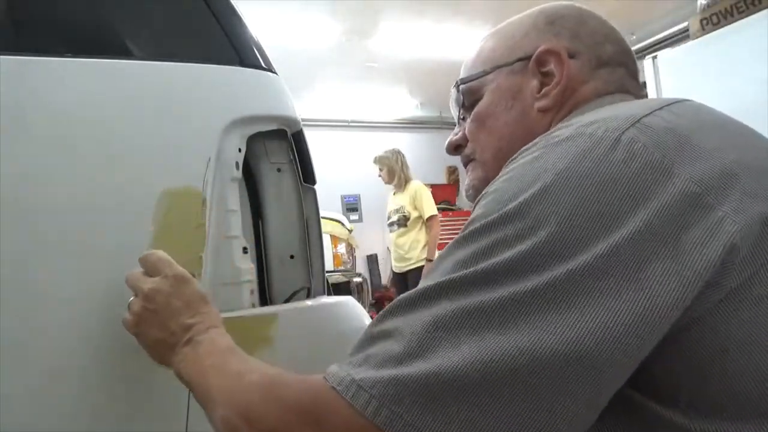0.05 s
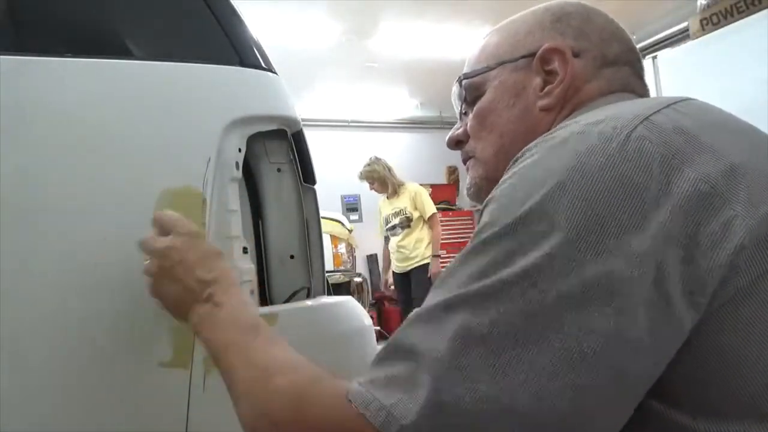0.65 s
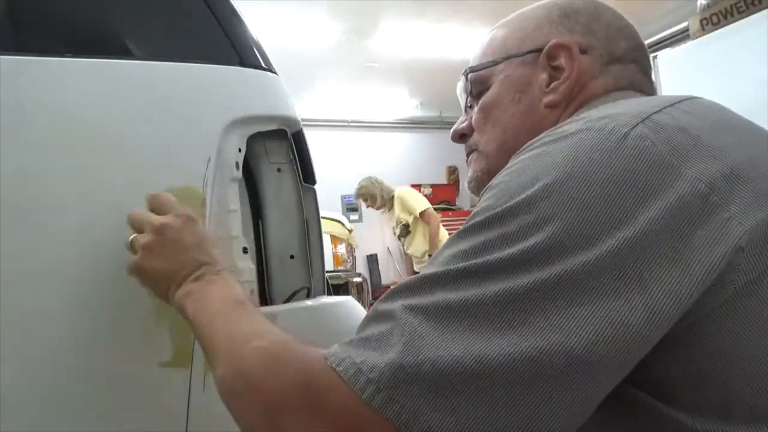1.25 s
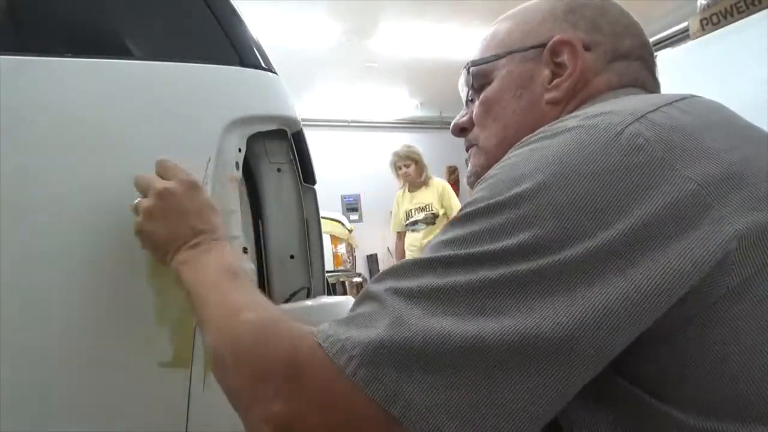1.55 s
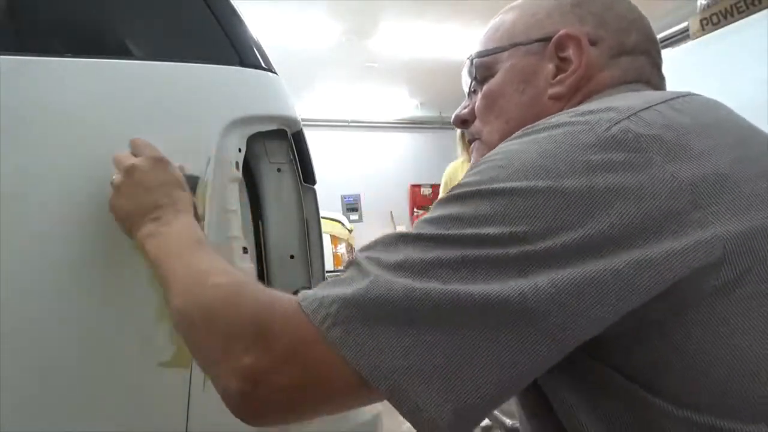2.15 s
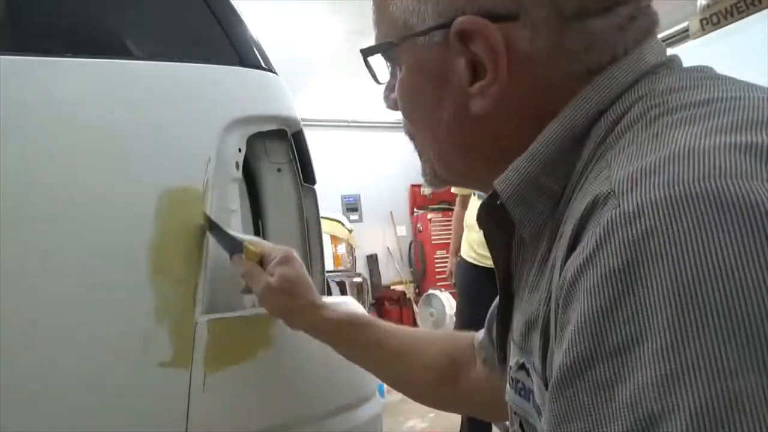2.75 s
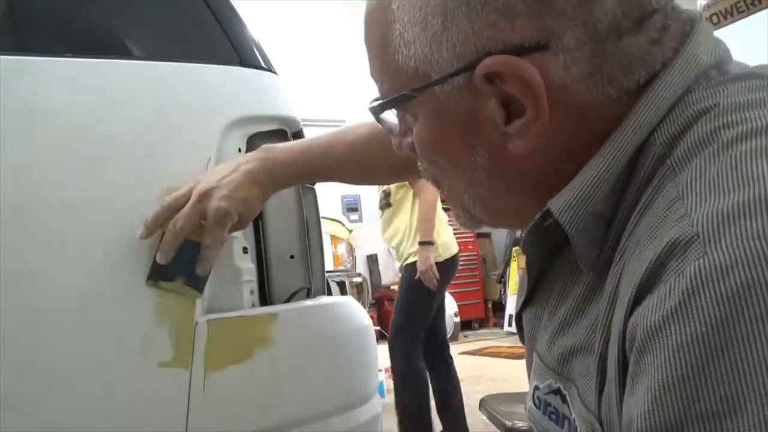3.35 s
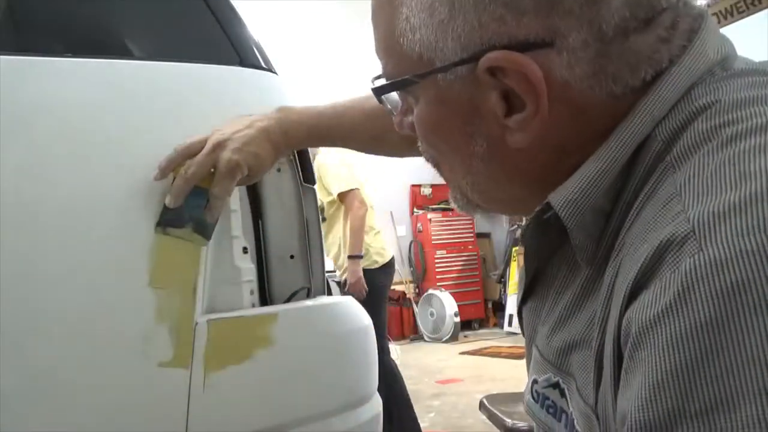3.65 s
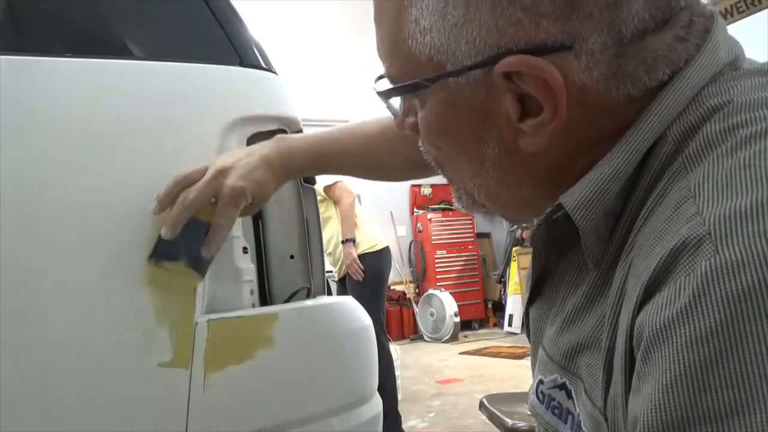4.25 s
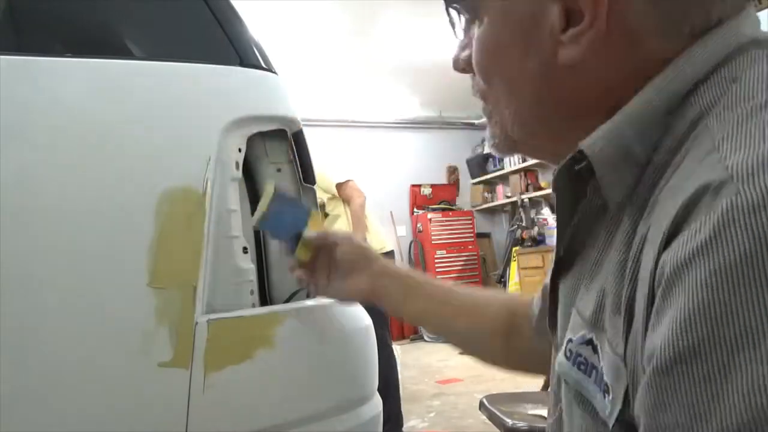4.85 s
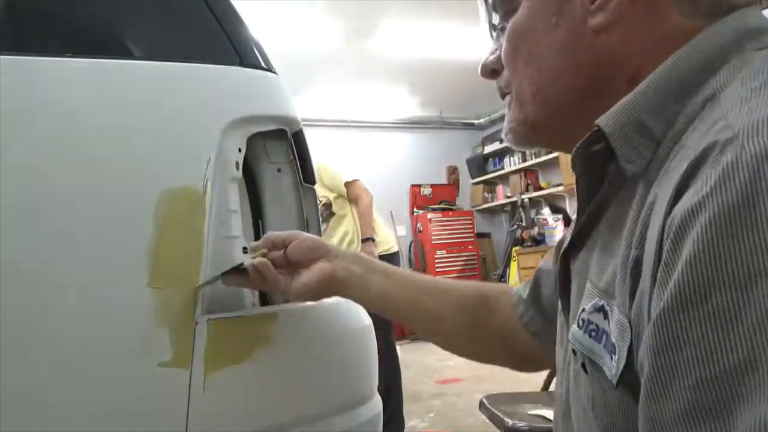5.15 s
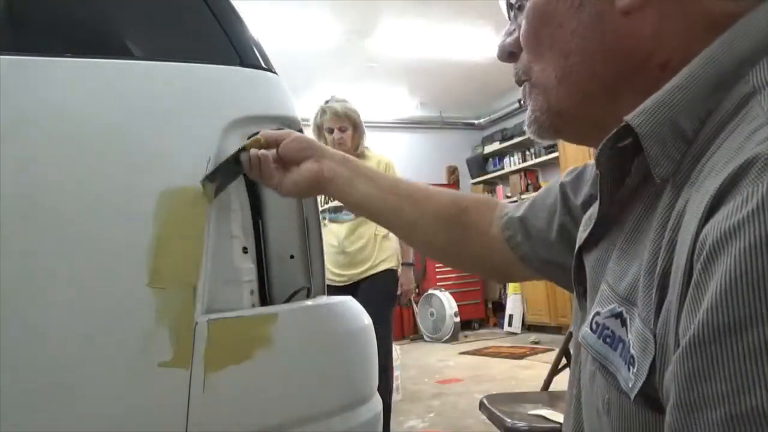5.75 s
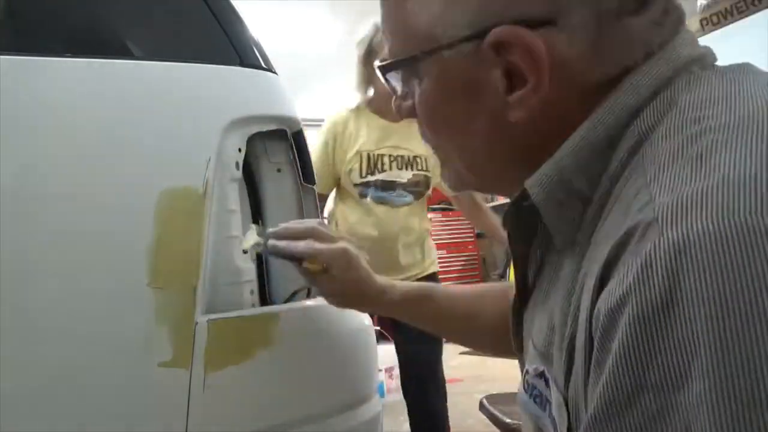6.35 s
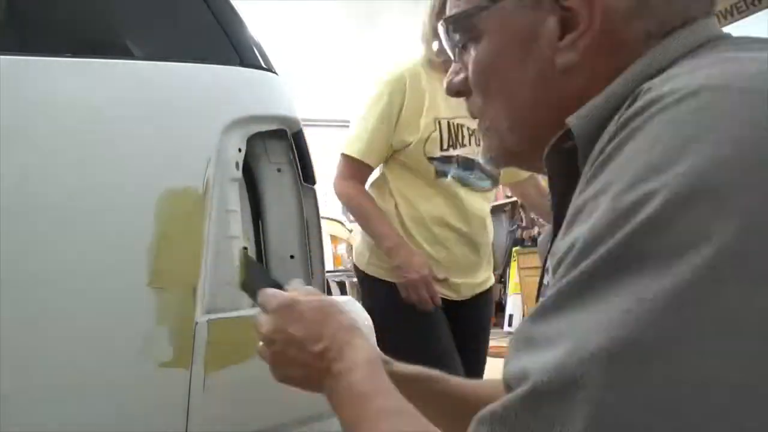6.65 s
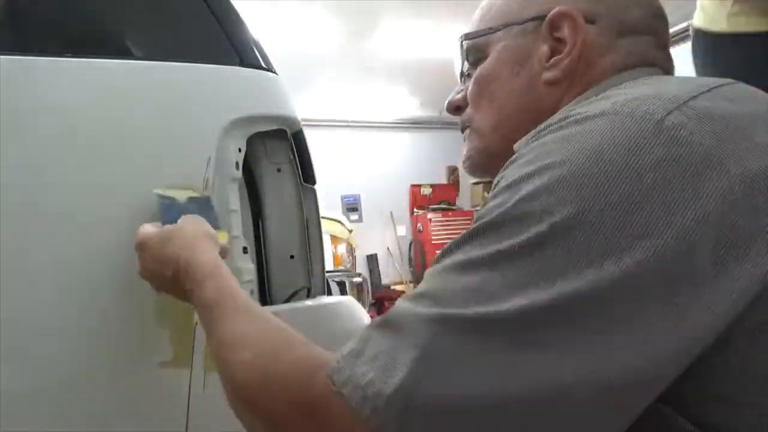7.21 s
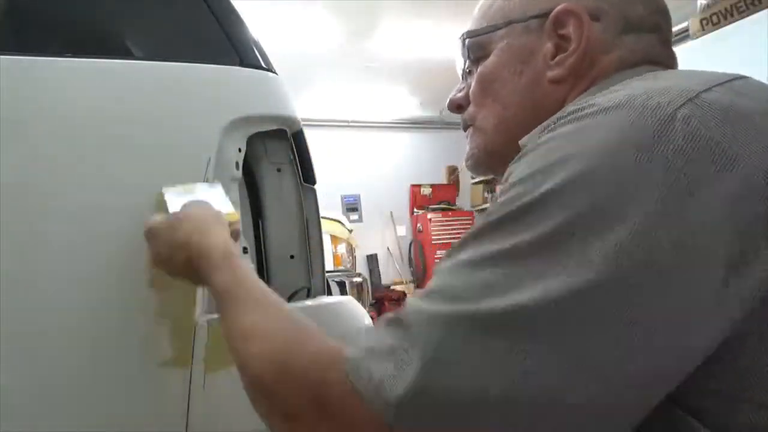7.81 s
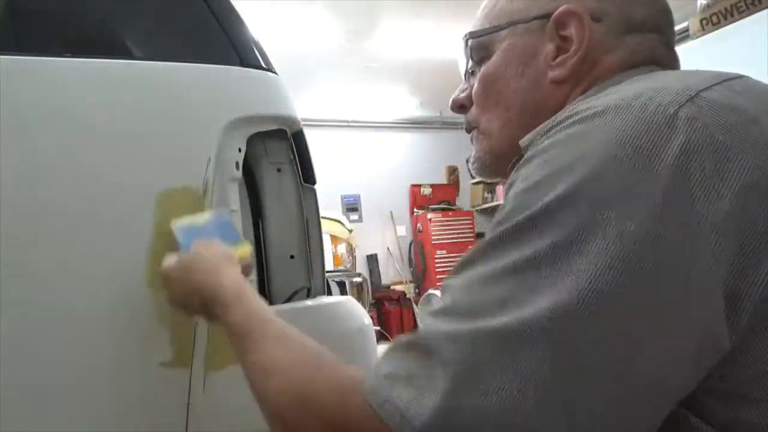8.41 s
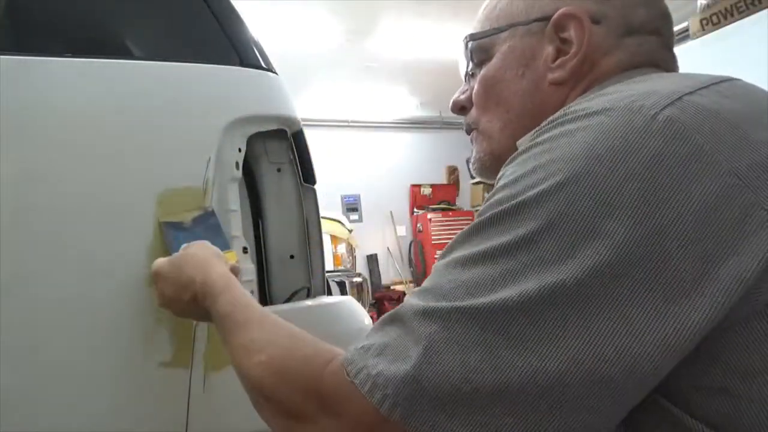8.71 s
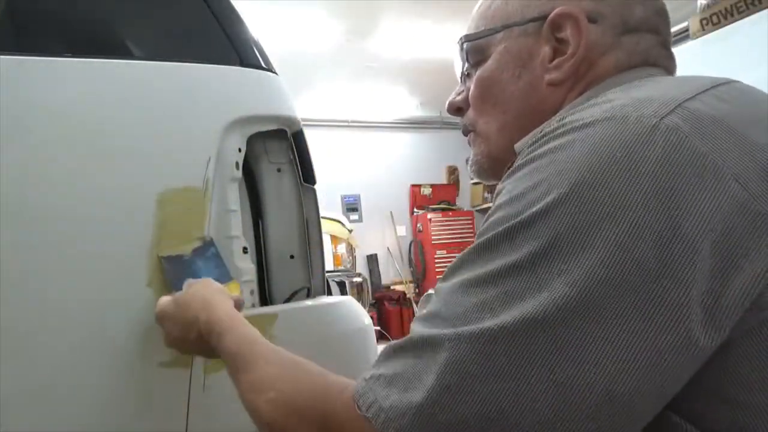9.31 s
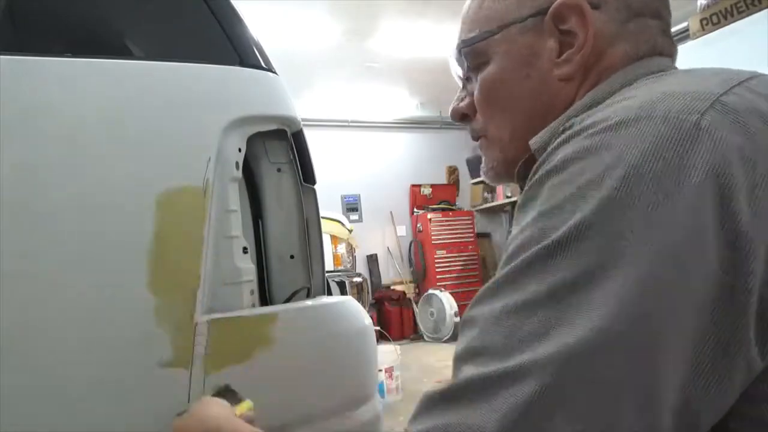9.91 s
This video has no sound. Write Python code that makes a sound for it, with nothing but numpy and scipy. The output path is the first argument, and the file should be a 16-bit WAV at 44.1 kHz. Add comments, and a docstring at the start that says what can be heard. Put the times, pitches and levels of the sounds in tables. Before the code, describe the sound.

A fan hums steadily in a garage while a small bird chirps sharply, followed by taps on a metal panel and brief sanding strokes.

```python
"""Sanding a van panel, with a bird in the garage.

A fan hums and hisses behind everything. Close to the microphones a man works a sanding sponge over
a painted panel: grit scrapes, the sponge squeaks, taps ring the metal, and someone walks behind him.
A small bird nearby gives six sharp chirps, shaped by its throat and beak, and whistles softly between
them. The camera's limiter ducks the fan under the chirps."""
import sys
import numpy as np
from scipy import signal
from scipy.fft import rfft, irfft, next_fast_len
from scipy.io import wavfile
from scipy.ndimage import uniform_filter1d

SR = 44100
rng = np.random.default_rng(int(sys.argv[2]) if len(sys.argv) > 2 else 0)


def store_pcm(level_fs):
    """Save levels as 16-bit WAV."""
    pcm = np.round(np.clip(level_fs, -1, 1) * 32767).astype(np.int16)
    wavfile.write(sys.argv[1], SR, np.atleast_2d(pcm).T)


N = 439661
T = np.arange(N) / SR
BINS = np.maximum(np.fft.rfftfreq(next_fast_len(N), 1 / SR), 1)

# Width of noise at the microphone pair. Each row: frequency in Hz, side minus mid in dB.
STEREO_WIDTH = [(60, -27), (99, -29), (160, -37), (270, -35), (450, -35), (740, -23.5), (1220, -18),
                (2010, -8.5), (3330, -7.5), (5500, -6), (9080, -7.5), (15000, -10.5)]
# Reflections off van and floor. Each row: left delay in seconds, right delay in seconds, gain in dB.
NEAR_ECHOES = [(.0031, .0036, -6), (.0074, 0.0052, -7), (0.0116, .0125, -7.5), (0.0172, .0164, -14)]
# Air rushing through the fan. Each row: frequency in Hz, relative density in dB.
AIR_SPECTRUM = [(25, -2), (55, -11), (90, -7), (130, -0.5), (220, 2), (265, -4), (350, 3), (450, -2),
                (650, 2), (850, 0), (2500, 0.5), (4300, -5), (8000, -8), (15800, -10)]
# Resonances of the fan housing. Each row: frequency in Hz, width in Hz, lift in dB.
HOUSING_MODES = [(160.2, 21, 5.8), (316.5, 4.1, 4), (532, 10.3, 9.2), (560, 13.4, 8), (618.4, 39, 7.2),
                 (661, 33, 7.85), (916, 31, 5.6), (1000, 150, 5.4), (1116, 110, 11.1), (1215, 52, 7),
                 (1260, 42, 9.1), (1321, 86, 9.6), (1650, 26, 9.3), (1756, 35, 3.3), (1945, 29, 9.2),
                 (2386, 13, 11), (2702, 83, 5.6), (3368, 76, 6.5), (3760, 53, 9.2), (4620, 72, 2.7),
                 (5500, 37, 3)]
# Hum of the fan motor. Each row: frequency in Hz, rms level in dB.
MOTOR_TONES = [(120, -62), (480, -54.5), (521, -52), (960, -42), (1093, -48), (1336, -39), (1480, -54),
               (2035, -58.5)]
# Knocks and thumps on the panel, with bumps and scuffs of feet.
# Each row: start in seconds, peak level in dB, centre in Hz.
KNOCKS_AND_BUMPS = [(3.091, -16.5, 2730), (3.398, -29, 300), (3.521, -25, 413), (3.545, -29, 130),
                    (5.684, -32, 150), (6.236, -35, 100), (7.119, -26, 1590), (8.284, -31.5, 190),
                    (9.243, -22, 1750), (9.249, -29, 150)]
# Pushes on the panel. Each row: start in seconds, gain in dB.
PANEL_PUSHES = [(9.065, -15), (9.251, -44)]
# Low modes of the panel. Each row: frequency in Hz, relative level in dB, seconds to fall 60 dB.
BOOM_MODES = [(140, -9, 0.078), (175, -15, 0.14), (321, 1.5, 0.11), (427, -6, 0.051), (500, -9, 0.054),
              (730, -3, 0.038)]
# Taps of sponge and fingers. Each row: start in seconds, level in dB.
PANEL_TAPS = [(5.823, -31), (7.120, -24.5), (7.758, -29.5), (9.0595, -20), (9.2435, -16), (9.459, -32)]
# The crunch of a tap. Each row: frequency in Hz, relative density in dB.
TAP_SPECTRUM = [(600, 2.5), (1500, 0.5), (4000, 1), (6200, 6.5), (9000, -0.5), (16000, -3)]
# Resonances of the panel's edge. Each row: frequency in Hz, width in Hz, lift in dB.
EDGE_RESONANCES = [(1580, 200, 14), (2220, 250, 14.2), (6000, 300, 2.2)]
# Grit on paint. Each row: frequency in Hz, relative density in dB.
GRIT_SPECTRUM = [(2000, -27), (4400, -4), (5200, 4.5), (6100, -3), (7100, 5.5), (8200, 4), (9300, -3),
                 (11200, -1.5), (12500, -11), (16000, -24)]
# Strokes of the sponge. Each row: start in seconds, length in seconds, level in dB.
SANDING_STROKES = [(7.64, 0.17, -41.5), (8.548, 0.28, -34.5), (9.73, 0.21, -43)]
# Sponge squeaks. Each row: start and length in seconds, middle pitch in Hz, glide in octaves, level in dB.
SPONGE_SQUEAKS = [(7.815, 0.022, 13300, .17, -42), (8.275, .055, 6040, -.26, -40),
                  (8.875, .1, 4800, -.09, -41)]
# Soft whistles. Each row: start and length in seconds, middle pitch in Hz, glide in octaves, level in dB.
BIRD_WHISTLES = [(2.584, 0.021, 3400, -0.062, -19), (2.715, 0.042, 4460, .08, -35.5),
                 (3.155, 0.025, 6620, -0.36, -40), (3.40, .11, 7450, 0.024, -41.5),
                 (4.355, 0.064, 7470, 0.18, -43), (4.535, .027, 7060, -0.051, -39),
                 (5.645, .055, 4640, -0.27, -37), (6.04, .085, 7350, 0.43, -42),
                 (6.135, .053, 7170, .04, -43), (6.775, 0.06, 4750, -0.31, -34)]
# Resonance of the bird's throat and beak. Each row: frequency in Hz, gain in dB.
THROAT_RESPONSE = [(1500, -43), (2200, 0.5), (2550, -10), (3000, 7), (4000, -21), (4750, -7.5), (5250, 1),
                   (6100, -22), (7800, -21), (8500, -12), (9200, -19), (10300, -10.5), (11300, -17.5),
                   (13000, -11), (16000, -42)]
# Sharp chirps. Each row: start and length in seconds, pitch the swoop aims at in Hz, then in dB
# the overall gain, fundamental gain, upper harmonics' gain and left minus right.
BIRD_CHIRPS = [(2.2857, 0.037, 2620, -7.5, -6, -1.5, -2.5), (2.563, .035, 2975, -6, -2.5, 1, -4),
               (2.838, 0.041, 2860, -7, -2, 3, -2.5), (4.2375, .044, 2723, -6, -7.5, 0, -3.5),
               (4.6371, .038, 2825, -5.5, -5, 3.5, -2), (6.605, .040, 2764, -5.5, -5, -0.5, -3)]


def from_db(db):
    """Decibels to gain."""
    return 10 ** (np.asarray(db) / 20)


def rms_one(x):
    """Scale to rms 1."""
    return x / np.sqrt(np.mean(x ** 2) + 1e-20)


def gain_at(points, hz):
    """Gain from a dB table, read on a log-frequency axis."""
    table_hz, table_db = np.transpose(points)
    return from_db(np.interp(np.log(hz), np.log(table_hz), table_db))


def add(out, start, sound, pan_db=0):
    """Mix a sound in at a time in seconds; pan is left minus right."""
    i = round(start * SR)
    out[:, i:i + sound.shape[-1]] += (sound * from_db([[pan_db / 2], [-pan_db / 2]]))[:, :N - i]


def noise(gain):
    """Noise of rms 1, coloured by a gain at each frequency."""
    size = next_fast_len(N)
    return rms_one(irfft(rfft(rng.standard_normal(size)) * gain, size)[:N])


def drift(rate_hz):
    """Random wander of rms 1, mostly slower than the given rate."""
    return noise(1 / (1 + (BINS / rate_hz) ** 2))


def resonant(spectrum, modes):
    """A smooth spectrum with resonances standing on it."""
    lift = sum((from_db(db) ** 2 - 1) / (1 + ((BINS - hz) / (0.48 * width)) ** 2) ** 2
               for hz, width, db in modes)
    return gain_at(spectrum, BINS) * np.sqrt(np.maximum(1 + lift, .1))


def stereo_noise(gain):
    """Noise at two close microphones, less alike towards the treble."""
    side_gain = gain * gain_at(STEREO_WIDTH, BINS)
    mid = noise(gain)
    side = noise(side_gain) * np.linalg.norm(side_gain) / np.linalg.norm(gain)
    return mid + side * [[1], [-1]]


def glides(rows, overtone_db, jitter, pan_db, easing, scratchy_hz=7000):
    """Thin gliding tones with an octave above, scratchier when high; positive easing levels them off."""
    out, tremble = np.zeros((2, N)), drift(500)
    for start, length, middle_hz, octaves, db in rows:
        progress = np.linspace(-.5, .5, int(length * SR))
        hz = middle_hz * 2 ** (octaves * (progress - easing * progress ** 2))
        scratch = jitter * min(middle_hz / scratchy_hz, 1) ** 3 * tremble[round(start * SR):][:len(hz)]
        phase = 2 * np.pi * np.cumsum(hz * (1 + scratch)) / SR
        tone = np.sin(phase) + from_db(overtone_db) * np.sin(2 * phase) * (2 * hz < SR / 2)
        add(out, start, from_db(db) * rms_one(tone * signal.windows.tukey(len(hz), .7)), pan_db)
    return out


def garage(x, build_s=0.0041, t60_s=0.12, tail_db=-4, side_share=0.47):
    """A few near reflections, then a short diffuse tail that the two microphones partly share."""
    t = T[:SR // 2]
    tail = rng.standard_normal(len(t)) + side_share * rng.standard_normal(len(t)) * [[1], [-1]]
    tail *= (1 - np.exp(-(t / build_s) ** 2)) * from_db(-60 * t / t60_s)
    response = from_db(tail_db) * rms_one(tail) / np.sqrt(len(t))
    for left_s, right_s, db in NEAR_ECHOES:
        response[[0, 1], [round(left_s * SR), round(right_s * SR)]] += from_db(db)
    return signal.fftconvolve(x, response, axes=1)[:, :N]


def fan(air_db=-31.5, wander_hz=1.215, flutter_db=1.5):
    """Air rushes through the housing; the motor's tones waver in the moving air."""
    air = from_db(air_db) * stereo_noise(resonant(AIR_SPECTRUM, HOUSING_MODES))
    hum = 0
    for hz, db in MOTOR_TONES:
        phase = 2 * np.pi * np.cumsum(hz + wander_hz * drift(9.3)) / SR
        hum += from_db(db) * rms_one(np.sin(phase) * from_db(flutter_db * drift(12)))
    return air + hum


def drone(hz=316, half_width_hz=7, db=-54.5, swell_at_s=7.03, swell_s=.8, swell_db=8):
    """A low, narrow drone sits in the fan's sound and swells late on."""
    band = noise(1 / (1 + ((BINS - hz) / half_width_hz) ** 2))
    swell = np.clip((T - swell_at_s) / swell_s, 0, 1)
    return band * from_db(db + swell_db * swell)


def knocks_and_bumps(shortest_t60_s=0.081, ring_cycles=6):
    """Panel knocks and thumps, bumps and scuffs of feet: bursts around one pitch, longer when low."""
    out, t = np.zeros((2, N)), T[:SR // 4]
    for start, db, hz in KNOCKS_AND_BUMPS:
        burst = rng.standard_normal(len(t)) * from_db(-60 * t / (shortest_t60_s + ring_cycles / hz))
        band = signal.butter(2, [hz / 1.7, hz * 1.34], "band", fs=SR, output="sos")
        bump = signal.sosfilt(band, burst)
        add(out, start, from_db(db) * bump / np.abs(bump).max())
    return out


def panel_booms():
    """A push sets the sheet metal booming in its low modes."""
    out, t = np.zeros((2, N)), T[:SR // 4]
    boom = sum((-1) ** k * np.sin(2 * np.pi * hz * t) * from_db(db - 60 * t / t60)
               for k, (hz, db, t60) in enumerate(BOOM_MODES))
    for start, db in PANEL_PUSHES:
        add(out, start, from_db(db) * boom)
    return out


def taps(rise_s=0.0019, t60_s=.025):
    """A tap is a brief crunch of grit that rings the panel's edge."""
    out, t = np.zeros((2, N)), T[:SR // 8]
    crunch = stereo_noise(resonant(TAP_SPECTRUM, EDGE_RESONANCES))
    fade = (1 - np.exp(-t / rise_s)) * from_db(-60 * t / t60_s)
    for k, (start, db) in enumerate(PANEL_TAPS):
        tap = fade / fade.max() * crunch[:, k * len(t):(k + 1) * len(t)]
        add(out, start, from_db(db) * tap, pan_db=-2)
    return out


def squeaks():
    """The sponge squeaks on the paint, right of centre."""
    return glides(SPONGE_SQUEAKS, overtone_db=-1, jitter=.02, pan_db=-4, easing=-.8)


def sanding(grain_db=1.5, ramp_share=0.19):
    """Grit catches on the paint in a fast, uneven hiss for the length of each stroke."""
    out = np.zeros((2, N))
    hiss = rms_one(stereo_noise(gain_at(GRIT_SPECTRUM, BINS)) * from_db(grain_db * drift(300)))
    for start, length, db in SANDING_STROKES:
        pressure = signal.windows.tukey(int(length * SR), ramp_share)
        stroke = pressure * hiss[:, round(start * SR):][:, :len(pressure)]
        add(out, start, from_db(db) * stroke, pan_db=-1)
    return out


def faint_whistles(count=4, from_s=4.6, until_s=6.5, length_s=.08, rise_octaves=0.167, db=-50.5):
    """Rows for the bird's faintest whistles, loosely spaced and at chance pitches."""
    slot_s = (until_s - from_s) / count
    rows = []
    for k, (late, high) in enumerate(rng.random((count, 2))):
        hz = 6450 * 2 ** (.2 * (2 * high - 1))   # up to 0.2 octave either way
        rows.append((from_s + (k + late) * slot_s, length_s, hz, rise_octaves, db))
    return rows


def whistles():
    """The bird whistles softly, dead centre, in nearly pure glides."""
    return glides(BIRD_WHISTLES + faint_whistles(), overtone_db=-20, jitter=0.031, pan_db=0, easing=.4)


def chirp_arch(length, top_hz, swoop_s=.0062, sag_s=0.01493, end_hz=2384,
               attack_s=0.0071, release_s=0.0062, rough_s=0.0071):
    """Pitch, effort and roughness of one chirp: it swoops up an octave, settles, then sags and frays."""
    t = T[:int(length * SR)]
    remaining = length - t
    swoop_hz = top_hz * (1 - .5 * np.exp(-t / swoop_s))
    sag_hz = (top_hz - end_hz) * np.maximum(1 - remaining / sag_s, 0)
    attack_db = -17 * np.maximum(1 - t / attack_s, 0)
    release_db = -4.5 * np.maximum(1 - remaining / release_s, 0)
    roughness = np.exp(-t / rough_s) + 0.43 * np.exp(-remaining / rough_s)
    return swoop_hz - sag_hz, attack_db + release_db, roughness


def chirps(flutter_db=2.5, rasp_db=-8.5, clean_jitter=.009, rough_jitter=.04):
    """Each chirp opens with a rasp, arches through the throat's resonances and roughens as it falls."""
    out, tremble = np.zeros((2, N)), drift(1280)
    no_bass = signal.butter(4, 1800, "high", fs=SR, output="sos")   # so small a throat gives no bass
    rasp = from_db(rasp_db) * signal.sosfilt(no_bass, noise(gain_at(THROAT_RESPONSE, BINS)))
    flutter = from_db(flutter_db * drift(630))   # fast unsteadiness roughens every partial
    lean_right = from_db([[-.5], [.5]])
    for start, length, top_hz, db, fundamental_db, upper_db, pan_db in BIRD_CHIRPS:
        pitch, effort_db, roughness = chirp_arch(length, top_hz)
        now = round(start * SR) + np.arange(len(pitch))
        hz = pitch * (1 + (clean_jitter + rough_jitter * roughness) * tremble[now])
        phase = 2 * np.pi * np.cumsum(hz) / SR
        first, second, *upper = (gain_at(THROAT_RESPONSE, k * hz) * np.sin(k * phase)
                                 for k in range(1, 5))
        brightness = from_db(upper_db + 0.28 * effort_db)   # upper harmonics grow with effort
        voice = from_db(fundamental_db) * first * lean_right + second + brightness * sum(upper)
        chirp = voice * flutter[now] + roughness * rasp[now]
        add(out, start, chirp * from_db(db + effort_db), pan_db)
    return out


def scene():
    """From beside the van: the bird sounds through the garage; the panel work is closer and drier."""
    bird = chirps() + whistles()
    work = sanding() + taps() + panel_booms() + knocks_and_bumps() + squeaks()
    room = garage(bird + from_db(-5) * work)
    return fan() + drone() + bird + work + room


def limiter(x, ceiling_db=-5, quick_db_per_s=260, slow_db_per_s=12, slow_share=0.3):
    """Peaks pull the gain down at once; part of it returns quickly, the rest slowly."""
    peak_db = 20 * np.log10(np.abs(x).max(axis=0) + 1e-9)
    over_db = np.maximum(peak_db - ceiling_db, 0)
    quick = np.maximum.accumulate(over_db + quick_db_per_s * T) - quick_db_per_s * T
    slow = np.maximum.accumulate(slow_share * over_db + slow_db_per_s * T) - slow_db_per_s * T
    return x * from_db(-uniform_filter1d(np.maximum(quick, slow), size=32))


def record(dry, low_cut_hz=70, top_cut_hz=15750):
    """The microphones shed the deepest bass, the limiter acts, then the top is cut."""
    low_cut = signal.butter(2, low_cut_hz, "high", fs=SR, output="sos")
    top_cut = signal.ellip(10, .05, 60, top_cut_hz, fs=SR, output="sos")
    return signal.sosfiltfilt(top_cut, limiter(signal.sosfilt(low_cut, dry)))


dry = scene()
out = record(dry)
store_pcm(out)
```